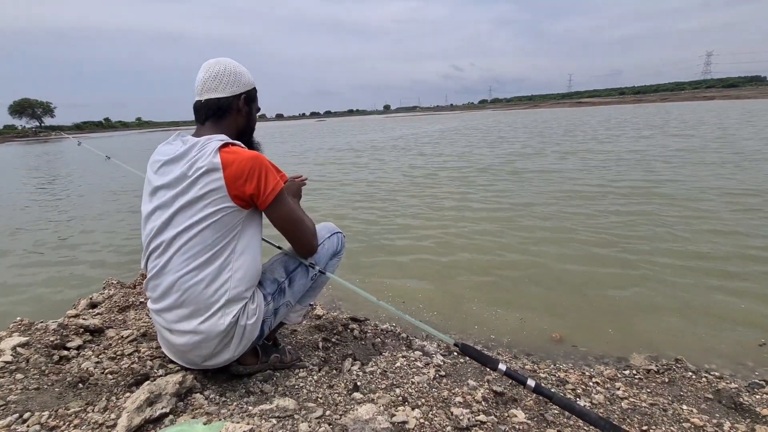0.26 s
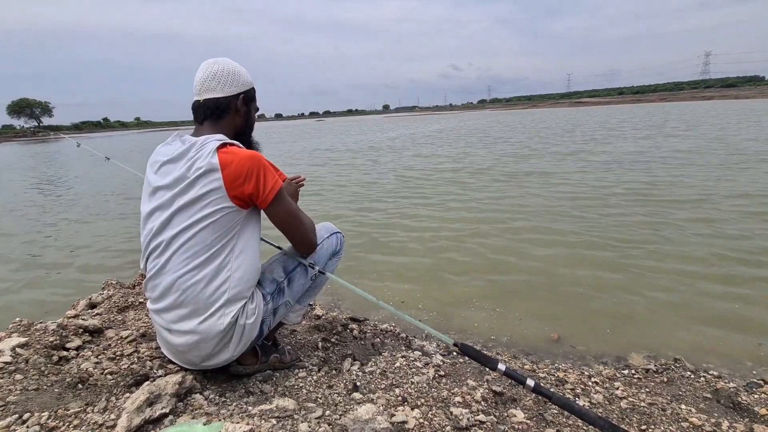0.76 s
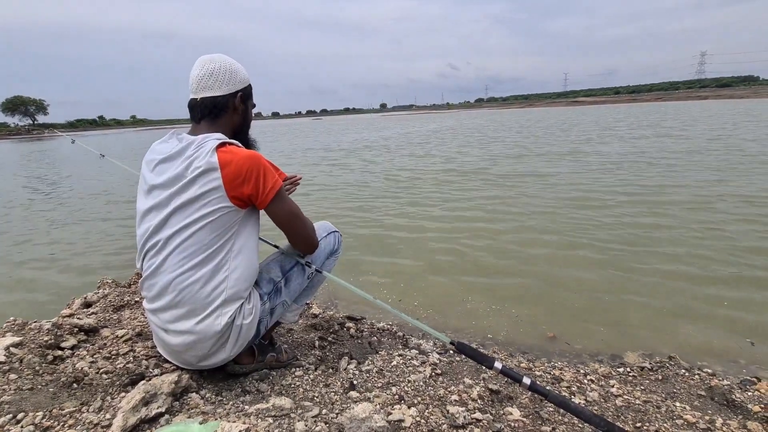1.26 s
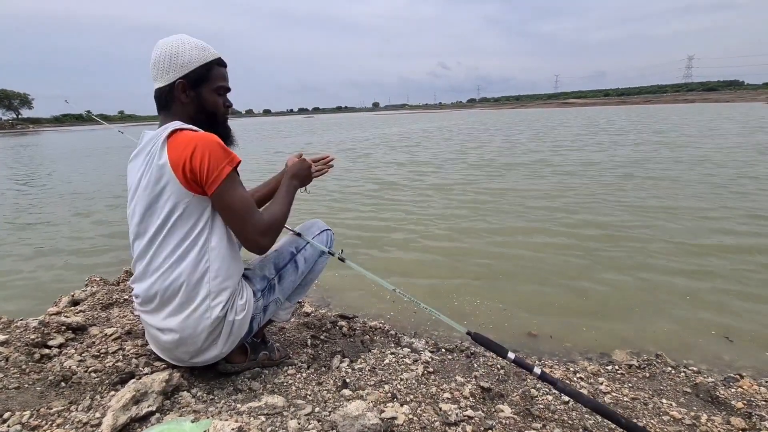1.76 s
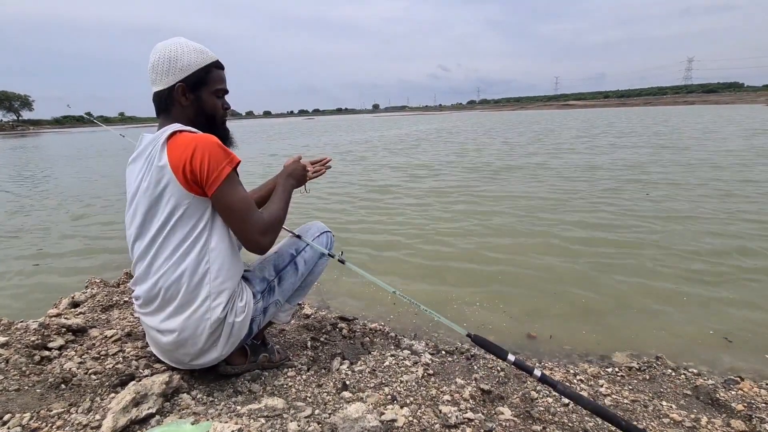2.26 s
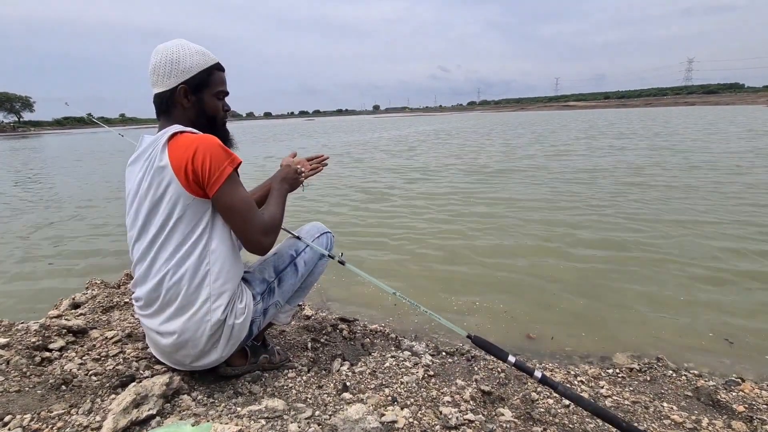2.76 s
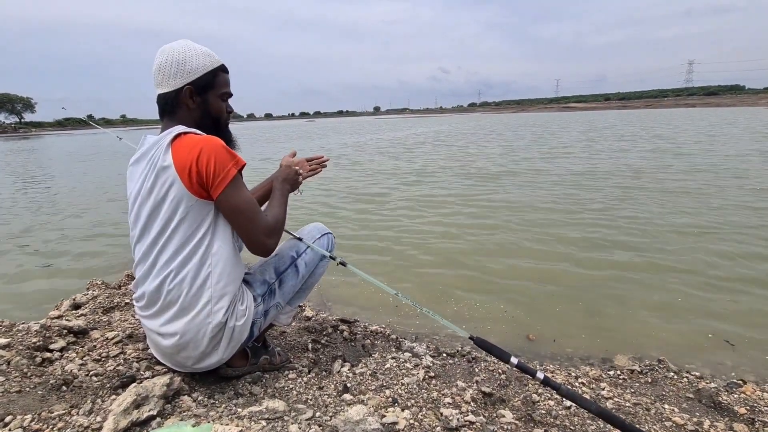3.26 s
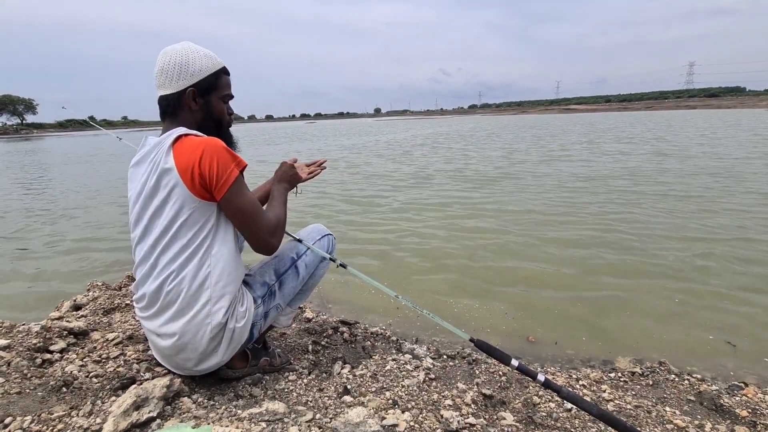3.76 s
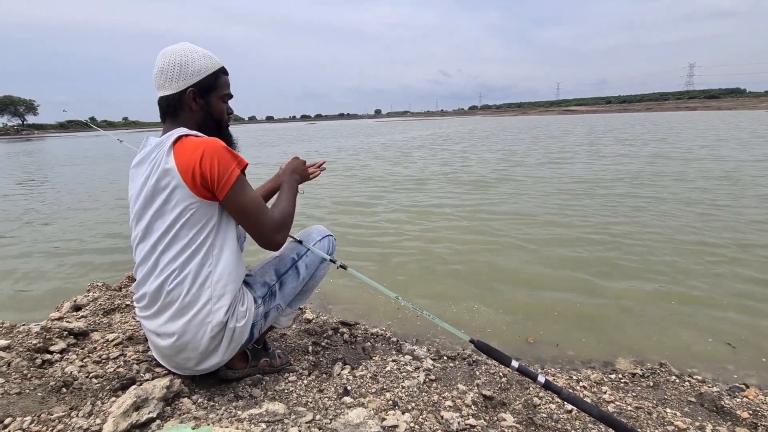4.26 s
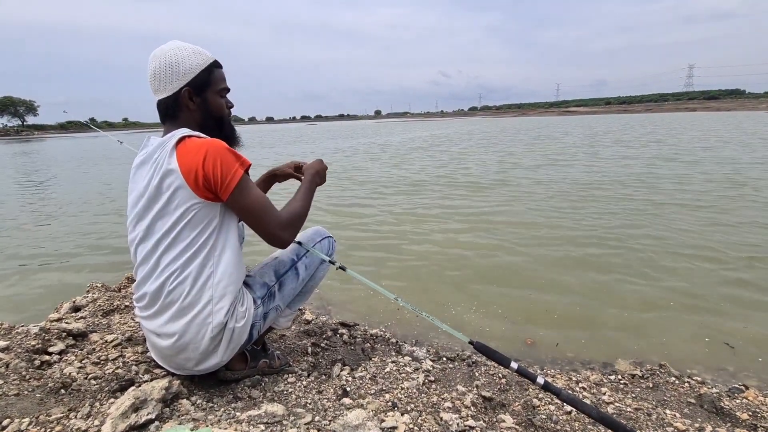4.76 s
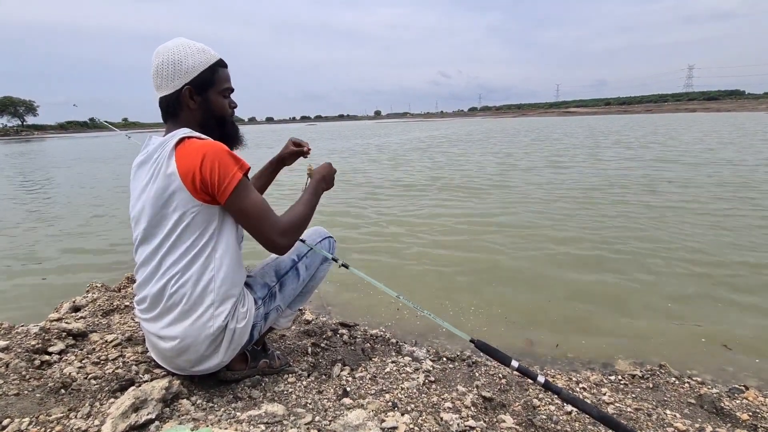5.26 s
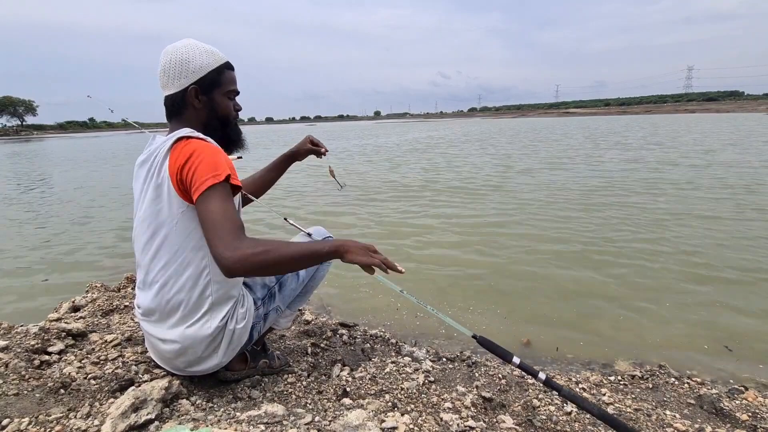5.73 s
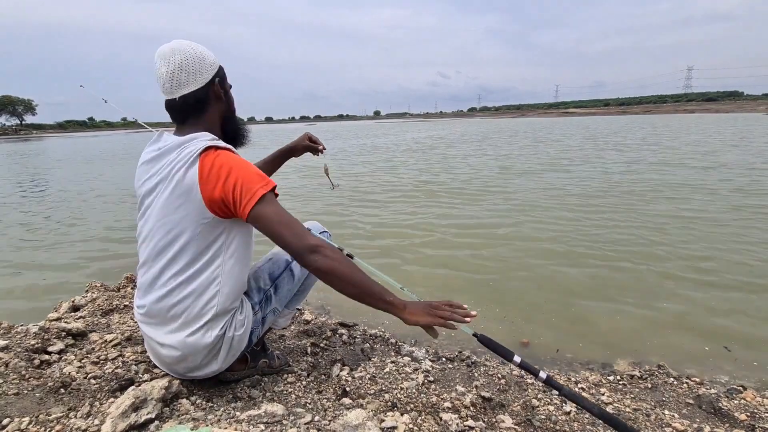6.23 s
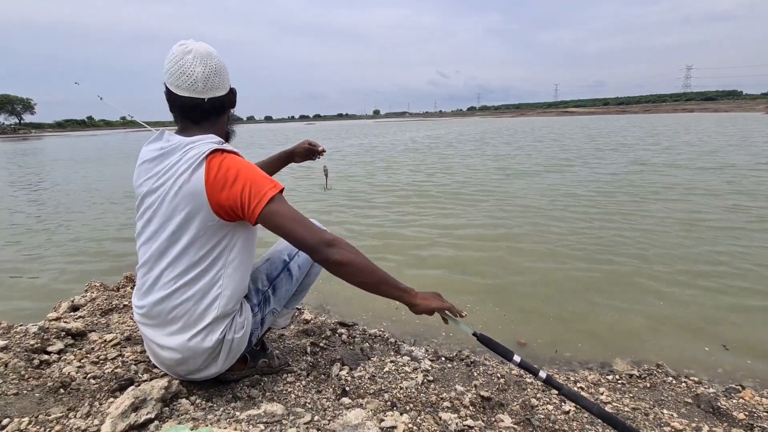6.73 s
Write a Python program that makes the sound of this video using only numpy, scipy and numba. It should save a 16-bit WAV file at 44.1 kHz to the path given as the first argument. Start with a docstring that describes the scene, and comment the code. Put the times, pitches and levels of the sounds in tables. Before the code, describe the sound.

Quiet open waterside with low, uneven wind rumble on the microphone and faint distant country noise. Small birds whistle and chip softly at first. Near two seconds a fairly close crow gives three rattling, nasal caws. A far crow answers twice, hoarse and smeared, then the near crow caws three more times. Faint tackle ticks, cloth rustle and tiny water bloops sit underneath. Stereo, near sounds leaning slightly left.

```python
"""A crow caws in two runs of three on the stony bank of a pond: pulses, rattled by a slow flap, ring its throat.
A far crow answers with the same voice, hoarser and smeared by echoes. Small birds whistle and chip: gliding sines.
Wind rumbles on the microphone ports and far country noise lies beneath: coloured noise.
Water bloops at the edge in rising tones, cloth rustles as treble noise, tackle ticks close by as ringing cracks."""
import sys
import numpy as np
from scipy import signal
from scipy.fft import rfft, irfft
from scipy.io import wavfile
from scipy.ndimage import uniform_filter1d
from numba import njit

SR = 44100
rng = np.random.default_rng(int(sys.argv[2]) if len(sys.argv) > 2 else 0)


def transcribe(u):
    """Save the signal u as a 16-bit wav file named by the first command-line argument.

    u: samples, shape (n,) or (channels, n), limited to [-1, 1]; the rate is SR.
    q: integer samples, one column per channel.
    """
    v = np.clip(np.atleast_2d(u).T, -1, 1)
    q = np.round(v * 32767).astype(np.int16)
    wavfile.write(sys.argv[1], SR, q)


def level_to_linear(level):
    """Convert decibel levels to linear amplitude factors, elementwise."""
    exponent = np.asarray(level, float) / 20
    return 10 ** exponent


N = 308406

# wind gusts on the ports, before each port's own trim: (time [s], level [dB])
GUSTS = [(0.0, -52), (0.08, -41), (0.27, -53.5), (0.39, -43.5), (0.76, -48), (0.84, -40.5), (1.13, -50),
         (1.15, -42.5), (1.69, -54), (1.77, -41.5), (2.12, -46.5), (2.66, -35), (2.71, -45), (2.8, -30),
         (2.96, -49), (3.31, -44.5), (3.62, -54.5), (4.28, -44), (4.83, -50), (4.92, -35), (5.02, -45),
         (5.12, -38), (5.16, -48.5), (5.45, -38.5), (6.09, -48), (6.99, -46)]
# colour of the wind rumble: (frequency [Hz], relative level [dB])
WIND_COLOUR = [(8.8, -37.5), (15, -7.5), (65, -0.5), (87, -5), (167, -21), (260, -25.5), (340, -41.5),
               (570, -120)]
# colour of the far country noise: (frequency [Hz], relative level [dB])
AIR_COLOUR = [(88, -36), (150, 0.5), (235, -8.5), (292, 1), (368, -12), (577, -11), (935, -15.5),
              (1220, -14), (3200, -16), (4320, -20.5), (8000, -37), (10400, -90), (17600, -120)]
# gain on the bass of the far noise: (time [s], gain [dB])
AIR_BASS = [(0, -3.5), (1.3, -2.5), (1.8, 4.5), (2.8, 0.5), (3.5, -1.5), (4.8, -0.5), (5.3, 3), (6.99, 1)]
# lean of the far noise: (frequency [Hz], left over right [dB])
AIR_BALANCE = [(200, -2.5), (1300, -4.5), (4400, -5), (8000, 11.5)]
# how alike the far noise is at the two ports: (frequency [Hz], likeness [0-1])
AIR_LIKENESS = [(130, 1), (290, 0.99), (640, 0), (1400, 0)]
# colour of the cloth: (frequency [Hz], relative level [dB])
CLOTH_COLOUR = [(2000, -7), (5000, 4), (8000, -5.5), (8800, -10.5), (10500, -4), (15000, -9.5)]
# cloth stirs, before the overall cloth gain: (time [s], peak level [dB], fade [dB/s])
RUSTLE = [(.3, -76, 32), (1.9, -71.5, 23), (2.3, -72.5, 17), (4.25, -85.5, 52), (5.45, -79, 2),
          (6.665, -84, 120), (6.98, -72, 30)]
# bubbles closing at the water's edge: (time [s], from [Hz], to [Hz], length [s], peak level [dB])
BLOOPS = [(3.799, 349, 482, 0.034, -56), (4.611, 1355, 2140, 0.024, -54), (5.631, 566, 620, 0.021, -49),
          (6.38, 604, 635, 0.013, -48)]
# a small bird's quick falling pairs of chips: (time [s], level of the first chip [dB])
CHIPS = [(0.381, -60.5), (1.8063, -54), (2.0826, -54), (2.84, -54.5), (3.2848, -57), (3.988, -54.5),
         (4.6498, -55), (5.221, -54.5), (6.0514, -57), (6.5965, -63.5), (6.7505, -46.5)]
# the clearest far whistles, and one low short call, perhaps the far crow's, before their flicker:
# (time [s], from [Hz], to [Hz], length [s], peak level [dB])
FAR_CALLS = [(.755, 4280, 4200, 0.041, -68), (2.75, 5380, 5300, 0.03, -55.5),
             (2.956, 4980, 4040, 0.044, -62), (3.045, 5300, 5340, .025, -56),
             (3.333, 5160, 5300, 0.043, -50.5), (3.441, 4600, 3690, .02, -58.5),
             (3.443, 1500, 1366, 0.025, -47.5), (3.619, 3920, 4580, 0.076, -59),
             (3.752, 4500, 3640, 0.032, -64), (5.191, 3760, 3640, 0.012, -53)]
# a far bird's run of quick falls, before their flicker: (time [s], peak level [dB])
FALLS = [(2.818, -58), (2.877, -56.5), (2.935, -59.5), (3.005, -54), (3.07, -62), (3.14, -54.5),
         (3.203, -54), (3.289, -60), (3.375, -57.5), (3.432, -62), (3.7, -60)]
# bounds of the two stretches of faint random whistles: (start [s], end [s], start [s], end [s])
CHATTER_S = (.45, 1.7, 2.75, 3.8)
# range of their starting pitch: (lowest [Hz], highest [Hz])
CHATTER_HZ = (4200, 5930)
# ticks of tackle and grit: (time [s], level [dB], ring [Hz])
TICKS = [(0.306, -55, 3630), (.345, -55, 2750), (0.476, -57, 6650), (0.605, -44.5, 4400),
         (0.867, -45, 6270), (1.069, -56, 6340), (1.856, -48.5, 2550), (2.316, -47, 3280),
         (2.389, -47, 2500), (3.23, -58.5, 10700), (5.144, -59.5, 3021), (6.664, -50, 6980)]
# songbird phrase around the start of its held note, before each song's own bend and level:
# (time [s], pitch [Hz], level [dB], share of the lead-in level [0-1])
PHRASE = [(-.042, 7040, -30, 0.8), (-.036, 6800, -27, 0.97), (-.025, 6650, -18.5, 1),
          (-.018, 5030, -10, 0.15), (-.012, 4105, -9.5, 0), (-.005, 3738, -2.5, 0.02),
          (-.002, 3680, -34, 0), (0, 4354, -10, 0), (.005, 4200, -7, 0), (0.035, 4132, -5, 0.13),
          (0.039, 3900, -39, 0.1)]
# each song: (time [s], level [dB], lead-in level [dB], arch of the held note [-1 to 1], its fall [share of pitch])
SONGS = [(0.851, -38.5, 1, 0.6, 0.0076), (0.989, -41, -4, 0.12, 0.025), (1.131, -38.5, -0.5, 0.27, 0.012),
         (1.92, -41, -22, 1, 0.043), (2.058, -37.5, 0, 0.082, .001), (2.208, -38.5, 3.5, 0.34, 0.0089),
         (2.37, -41.5, 4, 0.51, 0.018), (5.413, -38, -3, 0.48, 0.013), (5.545, -39, 0, 0.57, 0.0096),
         (5.684, -41, 2, 0.11, 0.024), (5.838, -41.5, 0.5, 1, .03)]
# near crow: (start [s], attack [s], crest [s], end [s])
CAWS = [(1.856, .002, 2.02, 2.124), (2.33, .045, 2.59, 2.8), (3.037, .026, 3.21, 3.338),
        (5.445, .075, 5.612, 5.886), (6.104, .03, 6.19, 6.484), (6.708, .028, 6.78, 6.984)]
# pitch line of each caw, before the rattle bends it: (time [s], pitch [Hz])
PITCH = [
    [(1.857, 542), (2.02, 578), (2.065, 553.5), (2.105, 469), (2.12, 443.1)],
    [(2.33, 530.5), (2.4, 587.3), (2.52, 613.6), (2.59, 621.4), (2.675, 572), (2.692, 531), (2.712, 526.4),
     (2.755, 432), (2.795, 412)],
    [(3.037, 561.5), (3.1, 601.3), (3.195, 648), (3.235, 604), (3.285, 624), (3.33, 480)],
    [(5.44, 439.1), (5.53, 599), (5.62, 589), (5.71, 570.5), (5.74, 520), (5.78, 472), (5.835, 470),
     (5.86, 405), (5.88, 340)],
    [(6.105, 557), (6.19, 597), (6.22, 584.5), (6.265, 476.3), (6.39, 466.6), (6.412, 495.5), (6.44, 467.4),
     (6.485, 366.4)],
    [(6.705, 540.7), (6.78, 583), (6.85, 533), (6.9, 479), (6.965, 448.4), (6.985, 380)],
]
# late in each caw the voice clears, then drops; the last stays rough almost to its end:
# (clear [s], drop [s], half-pitch share [0-1])
BREAKS = [(2.025, 2.092, .5), (2.69, 2.72, .6), (3.205, 3.285, .2), (5.725, 5.84, .1), (6.415, 6.445, .3),
          (6.955, 6.958, .6)]
# voicing of each caw: (crest level [dB], beak shift at the start [Hz], at the end [Hz],
# low resonance trim [dB], high resonance trim [dB], sag after the crest [dB])
VOICING = [(-33, 21, 5, -3.5, -8, 0.5), (-32, -12, 100, 0.5, 2, 4.5), (-27.5, -36, 100, -3.5, 1, 2.5),
           (-32.5, -71, 193, 2, -5, 6), (-34, 22, 230, 8.5, -4, 4.5), (-33.5, -27, 26, 4.5, -11, 5.5)]
# voice at the start, the crest and just before the break: (pitch rattle, closure depth, half-pitch share, hoarseness)
RATTLING = [(.97, .99, .4, .3), (.65, .72, .4, .26), (.88, .48, .45, .33)]
# voice from the break to the drop, and at the end: (pitch rattle and closure depth, hoarseness)
CLEAR = [(.18, .11), (.4, .55)]
# low and high throat resonances besides the main one, before any trim:
# (frequency [Hz], width [Hz], level [dB], gain per effort [dB/dB])
THROAT = [(1391, 284, -4, -0.5), (2496, 550, -24, 1.37)]
# breath rings higher up the throat: (frequency [Hz], width [Hz], level [dB])
RASP = [(4200, 1330, -34), (5300, 640, -32), (11100, 6700, -54)]
# the left port's colour on the near crow: (frequency [Hz], gain [dB])
CROW_LEFT = [(600, 13), (1000, 0.1), (1400, -0.5), (1800, 4.5), (2400, -3), (3500, -1.5)]
# the left port's phase shift on the near crow: (frequency [Hz], shift [rad])
CROW_TURN = [(500, -.6), (860, -1.42), (1300, -0.13), (1640, 0.43), (2000, -1.18), (3500, .1)]
# far crow: (start [s], crest [s], end [s], crest level [dB])
FAR_CROW = [(4.05, 4.454, 4.63, -59.5), (4.814, 5.153, 5.34, -65)]


def unit(x):
    """Scale to rms 1."""
    return x / np.sqrt(np.mean(x ** 2))


def curve(rows):
    """Columns of (time [s], value, ..) rows, drawn as lines with one value a sample."""
    s, *columns = np.transpose(rows)
    return [np.interp(np.arange(N) / SR, s, c) for c in columns]


def calls(tables):
    """Columns of several calls in turn, and a soft-edged gate that is open inside them."""
    t = np.arange(N) / SR
    gate = sum(1. * (t > c[0][0]) * (t < c[-1][0]) for c in tables)
    rows = [row for c in tables for row in c]
    return curve(rows) + [uniform_filter1d(gate, size=60)]


def over_hz(points):
    """(Frequency [Hz], value) points on the bins of a whole-length transform, along log frequency."""
    hz, value = np.transpose(points)
    bins = np.arange(N // 2 + 1) * SR / N
    return np.interp(np.log(bins + 1), np.log(hz), value)


def noise(colour):
    """Noise with a (frequency [Hz], level [dB]) colour, rms 1."""
    return unit(irfft(rfft(rng.standard_normal(N)) * level_to_linear(over_hz(colour)), N))


def walk(rate):
    """Random levels held 1 / rate seconds and slewed; rms 1."""
    k = int(SR / rate)
    held = np.repeat(rng.standard_normal(N // k + 1), k)
    return unit(uniform_filter1d(uniform_filter1d(held, k), k)[:N])


@njit
def svf(x, hz, width):
    """State-variable band-pass with a moving centre, gain 1 there."""
    y, band, low = np.empty(len(x)), 0., 0.
    for i in range(len(x)):
        g, k = np.tan(np.pi * hz[i] / SR), width / hz[i]
        v = (band + g * (x[i] - low)) / (1 + g * (g + k))
        band, low, y[i] = 2 * v - band, low + 2 * g * v, k * v
    return y


def steep(x, hz, width):
    """A resonance applied twice, for dark valleys."""
    hz = hz + np.zeros(len(x))
    once = svf(x, hz, 1. * width)
    return svf(once, hz, 1. * width)


def place(x, pan_db, lead_s, left=1):
    """Two ports: the left one hears it lead_s sooner, pan_db louder, through its own response."""
    turn = np.exp(2j * np.pi * np.arange(N // 2 + 1) * SR / N * lead_s)
    left_port = irfft(rfft(x) * turn * left, N)
    return np.array([left_port * level_to_linear(pan_db / 2), x * level_to_linear(-pan_db / 2)])


def outdoors(x, wet_db, t60_s):
    """Scattered echoes from ground and bank, unlike at the two ports."""
    t = np.arange(int(.5 * SR)) / SR
    fade = np.exp(-np.log(1000) * t / t60_s)
    tail = rng.standard_normal((2, len(t))) * fade * (t > .003)
    tail = tail / np.sqrt(np.sum(tail ** 2, axis=1, keepdims=True))
    return x + level_to_linear(wet_db) * signal.fftconvolve(x, tail, axes=1)[:, :N]


def add(out, s, grain):
    """Mix a grain in at s seconds."""
    i = int(s * SR)
    out[..., i:i + grain.shape[-1]] += grain[..., :N - i]


def glide(from_hz, to_hz, length_s, fall):
    """A short gliding tone with an arched level; fall > 0 tilts the arch toward its start."""
    u = np.linspace(0, 1, int(length_s * SR))
    shape = np.sin(np.pi * u) * np.exp(-fall * u)
    phase = 2 * np.pi * np.cumsum(from_hz * (to_hz / from_hz) ** u) / SR
    return shape / shape.max() * np.sin(phase)


def wind():
    """Eddies buffet each port on its own, the left one harder; a part is common to both."""
    # above the split the wind follows the gusts only in part
    split_hz, follow_share, pivot_db = 111.4, 0.57, -48
    both, gust_db = noise(WIND_COLOUR), curve(GUSTS)[0]
    flutter_db = pivot_db + follow_share * (gust_db - pivot_db)
    low, high = (signal.butter(2, split_hz, kind, fs=SR, output="sos") for kind in ("low", "high"))
    ports = np.array([level_to_linear(db + 2.47 * walk(10)) * (noise(WIND_COLOUR) + 0.4 * both) for db in (2.8, -1.8)])
    rumble = level_to_linear(gust_db) * signal.sosfilt(low, ports)
    flutter = level_to_linear(flutter_db) * signal.sosfilt(high, ports)
    # opposite signs keep the two bands from cancelling at the split
    return rumble - flutter


def rustle_db():
    """Cloth is never quite still; each stir rises fast and fades."""
    still_db, rise_db_s = -81, 127
    t = np.arange(N) / SR
    stirs = sum(level_to_linear(db - np.where(t < s, rise_db_s * (s - t), fade * (t - s))) ** 2 for s, db, fade in RUSTLE)
    return 10 * np.log10(level_to_linear(still_db) ** 2 + stirs)


def air():
    """Far country noise, alike at both ports only in the bass, and the rustle of cloth above it."""
    bass_hz = 493
    alike = np.clip(over_hz(AIR_LIKENESS), 0, 1)
    mid, side = (rfft(noise(AIR_COLOUR)) * np.sqrt(1 + k * alike) for k in (1, -1))
    lean = level_to_linear(over_hz(AIR_BALANCE) / 2)
    ports = np.array([irfft((mid + side) * lean, N), irfft((mid - side) / lean, N)])
    far = level_to_linear(-62.5 + 0.05 * walk(1.5)) * ports
    bass = signal.sosfiltfilt(signal.butter(2, bass_hz, fs=SR, output="sos"), far)
    far = far + (level_to_linear(curve(AIR_BASS)[0]) - 1) * bass
    cloth = np.array([level_to_linear(2.0 * walk(40) + db) * noise(CLOTH_COLOUR) for db in (-1.5, 1.5)])
    return far + level_to_linear(rustle_db() + 8.5) * cloth


def water():
    """Bubbles ring and rise in pitch; many tiny ones lap all the time."""
    out = np.zeros(N)
    for s, from_hz, to_hz, length_s, db in BLOOPS:
        add(out, s, level_to_linear(db) * glide(from_hz, to_hz, length_s, fall=0.62))
    for when, pitch, size in rng.random((300, 3)):
        hz = 900 * 4.93 ** pitch
        db = -73.0 - 5.5 * np.log(1 - .95 * size)  # few are loud
        add(out, when * N / SR, level_to_linear(db) * glide(hz, 1.14 * hz, 12 / hz, fall=1.4))
    return place(out, -7.5, .0001)


def small_birds():
    """Pairs of chips that fall steeply in a few milliseconds and end in a low blip; far flickering calls."""
    chips, far_calls = np.zeros(N), np.zeros(N)
    for s, db in CHIPS:
        add(chips, s - .001, level_to_linear(db) * glide(8720.0, 5900.0, 0.0076, fall=1.9))
        add(chips, s + 0.02, level_to_linear(db + 5.0) * glide(8960.0, 4600.0, 0.00448, fall=0.75))
        add(chips, s + .026, level_to_linear(db - 2.5) * glide(3940.0, 3650.0, 0.0052, fall=0))
    for s, from_hz, to_hz, length_s, db in FAR_CALLS:
        add(far_calls, s, level_to_linear(db) * glide(from_hz, to_hz, length_s, fall=0))
    for s, db in FALLS:
        add(far_calls, s, level_to_linear(db) * glide(6930.0, 5150., .016, fall=0))
    # fainter whistles at random, in two stretches
    for when, pitch, softness, length in rng.random((26, 4)):
        s = np.interp(when, [0.019, .35, .35, 1], CHATTER_S)
        hz = np.interp(pitch, [0, 1], CHATTER_HZ)
        add(far_calls, s, level_to_linear(-61.5 - 4.7 * softness) * glide(hz, .88 * hz, .01 + .03 * length, fall=0))
    flickering = far_calls * level_to_linear(3.8 * walk(200))
    return place(chips, -6.0, 0.000242) + place(flickering, -7.0, 0.000292)


def ticks():
    """A short crack of noise, part bright, part dull, that rings briefly."""
    out, t = np.zeros(N), np.arange(600) / SR
    shape = t / 0.0005 * np.exp(1 - t / 0.00049)
    for (s, db, hz), crack in zip(TICKS, rng.standard_normal((len(TICKS), len(t)))):
        bright = 0.091 * np.diff(crack, prepend=0)
        dull = 2.04 * uniform_filter1d(crack, size=7)
        ring = unit(steep(crack, 1. * hz, 2600))
        add(out, s - .001, level_to_linear(db) * shape * (bright + dull + ring))
    return place(out, -7.5, 0.000337)


def songbird():
    """One whistled phrase, bent a little each time: a lead-in, a steep fall, a held note."""
    out = np.zeros(N)
    s, hz, db, share = np.transpose(PHRASE)
    t = np.arange(s[0], s[-1], 1 / SR)
    held = np.clip(t / s[-1], 0, 1)
    for at, song_db, lead_db, arch, fall in SONGS:
        bow = arch * 0.079 * (t > 0) * (np.sin(2.5 * held) - .7)
        slope = fall * (t > 0) * (.5 - held)
        pitch = np.interp(t, s, hz) * (1 + bow + slope)
        level = level_to_linear(song_db + np.interp(t, s, db + lead_db * share))
        add(out, at + s[0], level * np.sin(2 * np.pi * np.cumsum(pitch) / SR))
    return place(out * level_to_linear(3.0 * walk(150)), -11.0, 0.000458)


def caw(hz, effort_db, depth, closure, half, hoarse, shift_hz=0, low_db=0, high_db=0):
    """Syrinx pulses, cut off and bent by a slow flap of tissue, ring the throat; level evened to 1."""
    flap = 2 * np.pi * np.cumsum(87. * (1 + 0.02504 * walk(8) + 0.09 * walk(60))) / SR
    shut = ((1 + np.cos(flap)) / 2) ** 2.7
    slack = ((1 + np.cos(flap)) / 2) ** 3.5
    # the pitch sags most around each closure
    rattle = depth * (.045 * np.sin(flap) - .25 * (slack - .27))
    jitter = (.004 + .2 * hoarse ** 2) * walk(200)
    phase = 2 * np.pi * np.cumsum(hz * (1 + rattle + jitter)) / SR
    pulses = sum(np.cos(k * phase) for k in range(1, 7))
    # strong and weak pulses in turn fill in lines at half the pitch
    pulses = pulses * (1 + half * np.cos(phase / 2))
    opening = (1 - closure * shut) * level_to_linear((0.4 + 0.91 * closure) * walk(90))
    breath = 3.5 * rng.standard_normal(N) * (1 + np.cos(phase)) * opening
    source = pulses * opening + hoarse * breath
    # more effort opens the beak: the main resonance rises and the voice brightens
    main = steep(source, 1688 + shift_hz + 30.0 * effort_db, 410)
    low, high = (level_to_linear(db + trim_db + slope * effort_db) * steep(source, 1. * f, width)
                 for (f, width, db, slope), trim_db in zip(THROAT, (low_db, high_db)))
    body_band = signal.butter(4, [800, 2130], "band", fs=SR, output="sos")
    voice = signal.sosfilt(body_band, main + low) + high
    chest = level_to_linear(-40.5) * steep(source, 490.0, 780)
    rasp = sum(level_to_linear(db) * steep(breath, 1. * f, width) for f, width, db in RASP)
    voice = voice + chest + rasp
    return voice / np.sqrt(uniform_filter1d(voice ** 2, size=1500))


def crow_controls():
    """Each caw swells to a crest, sags and holds; its flap closes less and less up to the break.
    Its pitch rattle eases at the crest and deepens again; both shrink at the break, and the end frays."""
    swell_db, silent_db = 6, 26  # below the crest after the attack; at the edges
    fray_db, dull_db = 6.5, 10  # lost after the drop; off the high resonance at the edges
    clear_s, release_s, sag_s = .025, .018, .085
    level, voice, throat = [], [], []
    for (s, attack_s, crest, end), (clear, drop, half), voicing in zip(CAWS, BREAKS, VOICING):
        top_db, from_hz, to_hz, low_db, high_db, sag_db = voicing
        held_db = top_db - sag_db
        level.append([(s, top_db - silent_db), (s + attack_s, top_db - swell_db), (crest, top_db),
                      (min(crest + sag_s, drop - .01), held_db), (drop, held_db),
                      (end - release_s, held_db - fray_db), (end, top_db - silent_db)])
        voice += [(s, *RATTLING[0]), (min(crest, clear - 2 * clear_s), *RATTLING[1]),
                  (clear - clear_s, *RATTLING[2])]
        for at, (rattle, hoarse) in [(clear, CLEAR[0]), (drop, CLEAR[0]), (end, CLEAR[1])]:
            voice.append((at, rattle, rattle, half, hoarse))
        for at, loss_db in [(s, dull_db), (crest, 0), (clear, 0), (drop, 0.46 * dull_db), (end, dull_db)]:
            shift_hz = np.interp(at, [s, end], [from_hz, to_hz])
            throat.append((at, shift_hz, low_db, high_db - loss_db))
    hz = uniform_filter1d(curve(sum(PITCH, []))[0], size=300)
    return hz, calls(level), curve(voice) + curve(throat)


def crow():
    """The near crow: the caw voice under its level, heard with its own colour and phase at the left port."""
    hz, (db, gate), voicing = crow_controls()
    voice = gate * level_to_linear(db) * caw(hz, np.maximum(db, -48) + 31.5, *voicing)
    left = level_to_linear(over_hz(CROW_LEFT)) * np.exp(1j * over_hz(CROW_TURN))
    return place(voice, -7.5, .00048, left)


def far_crow():
    """A far crow, smeared and hoarse, with a wash of breath above when it is loud."""
    edge_db = 11  # below the crest at start and end
    db, gate = calls([[(s, top_db - edge_db), (crest, top_db), (end, top_db - edge_db)]
                      for s, crest, end, top_db in FAR_CROW])
    effort_db = np.maximum(db, -72) + 59.0
    wash = level_to_linear(-6.0 + 0.45 * effort_db) * unit(steep(rng.standard_normal(N), 3240.0, 1700))
    voice = caw(490 + 2.0 * effort_db, 1 + .6 * effort_db, depth=.7, closure=.7, half=.2, hoarse=.9,
                shift_hz=120, low_db=3)
    return outdoors(place(gate * level_to_linear(db) * (voice + wash), -8.0, 0.00041), -1.2, 0.24)


def scene():
    """Birds, ticks and water echo off ground and bank; wind and air do not."""
    near_crow = outdoors(crow(), -14.5, 0.17)
    birds = outdoors(songbird() + small_birds(), -8.0, 0.16)
    bank = outdoors(ticks() + water(), -2.5, 0.076)
    return near_crow + birds + bank + far_crow() + wind() + air()


def top_cut(x):
    """Nothing passes above the cut-off."""
    return signal.sosfilt(signal.butter(12, 15500, fs=SR, output="sos"), x)


def record(dry):
    """A phone cuts the top with a steep low-pass."""
    top_hz = 15350
    low_pass = signal.ellip(8, .2, 60, top_hz, fs=SR, output="sos")
    return top_cut(signal.sosfilt(low_pass, dry))


dry = scene()
out = record(dry)
transcribe(out)
```